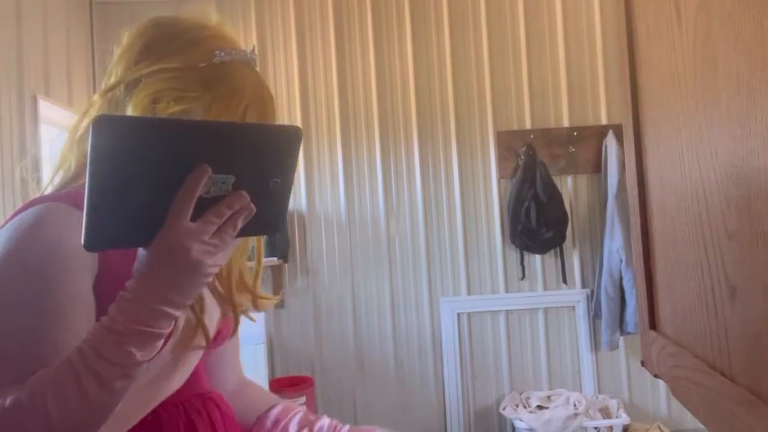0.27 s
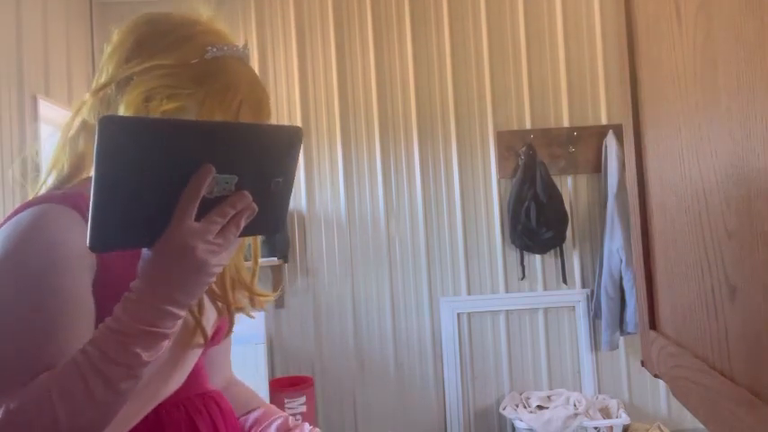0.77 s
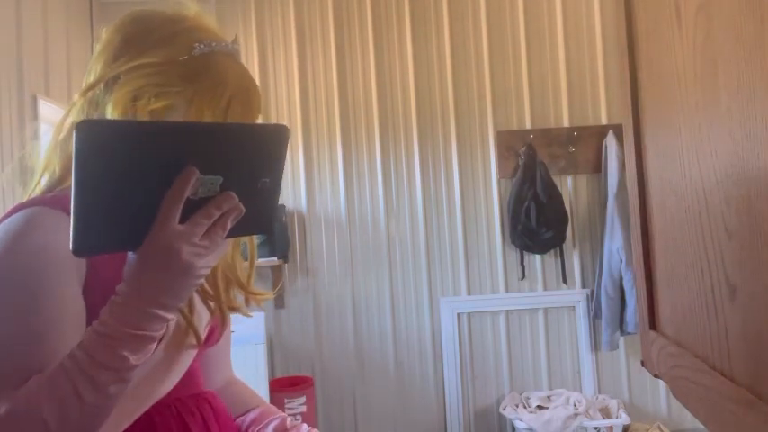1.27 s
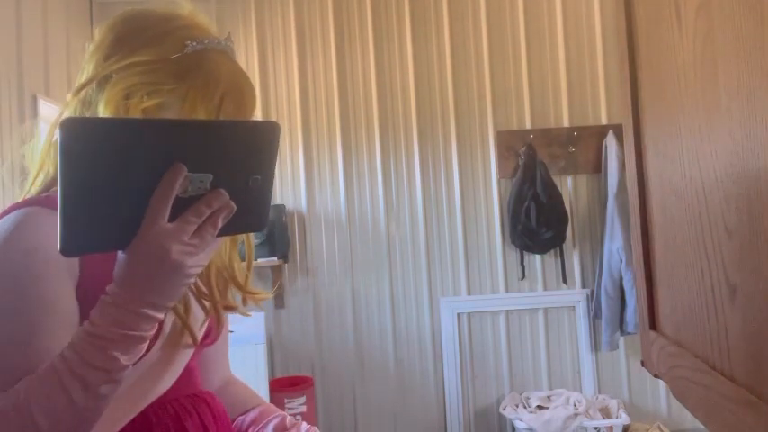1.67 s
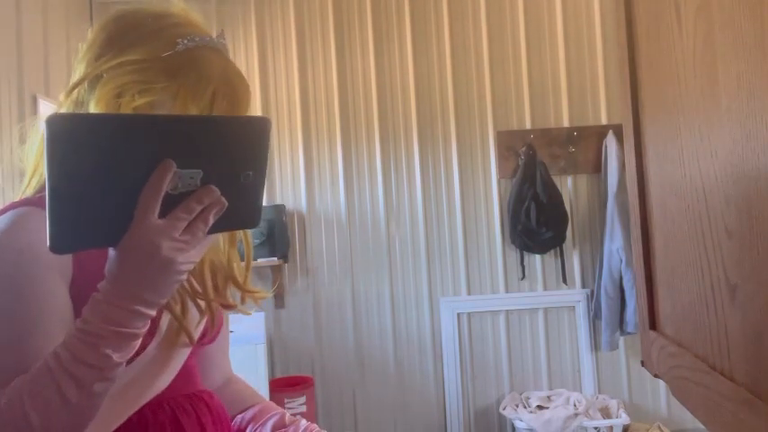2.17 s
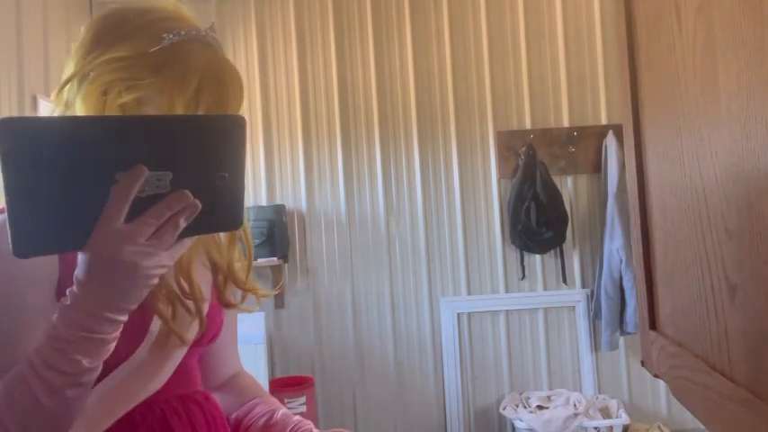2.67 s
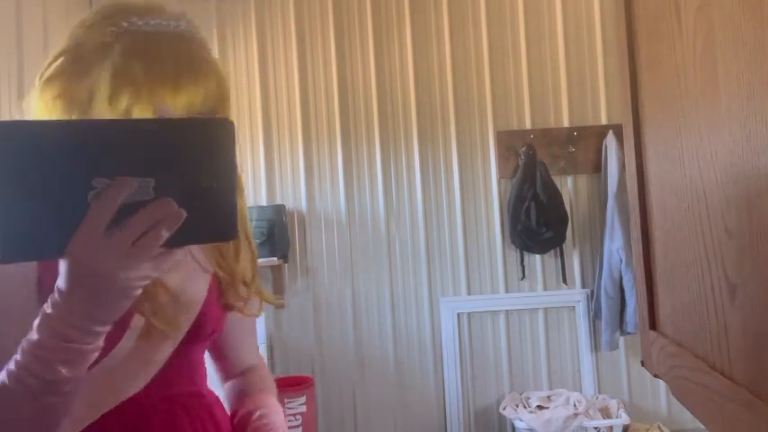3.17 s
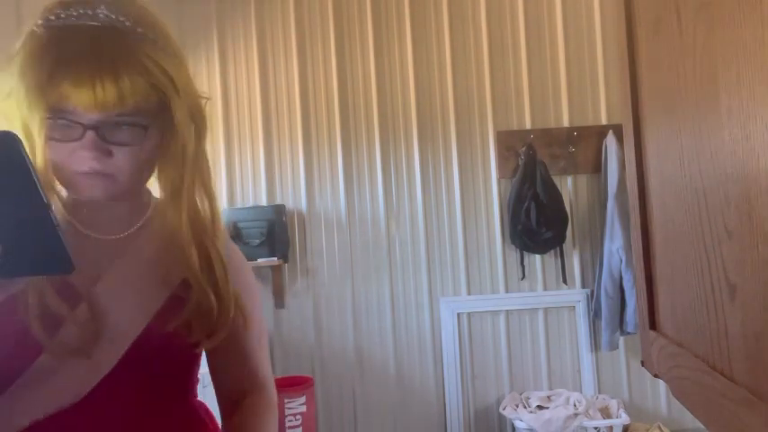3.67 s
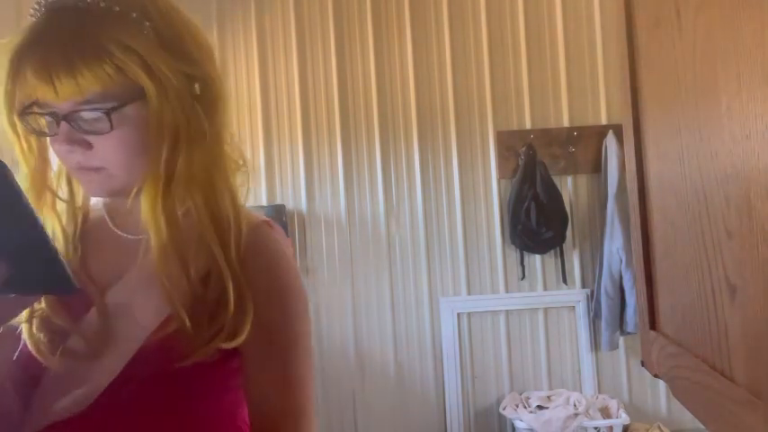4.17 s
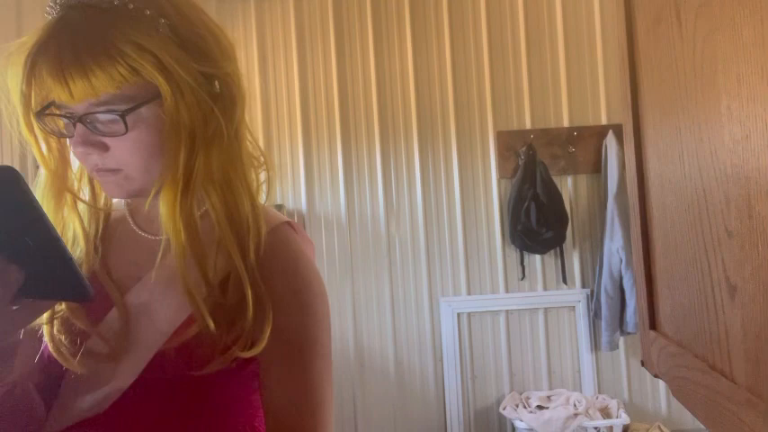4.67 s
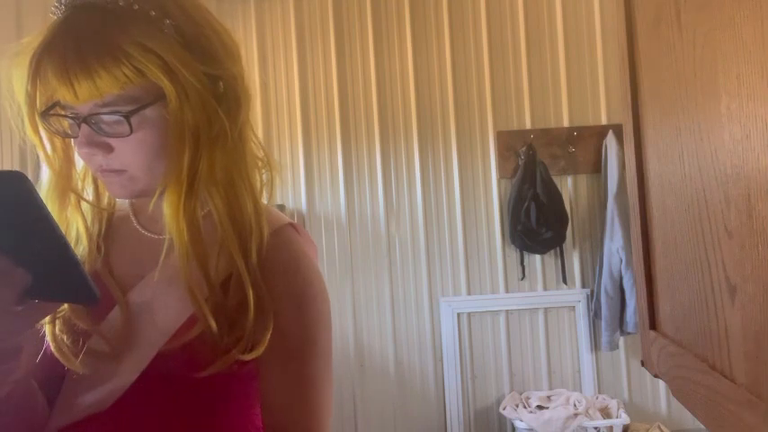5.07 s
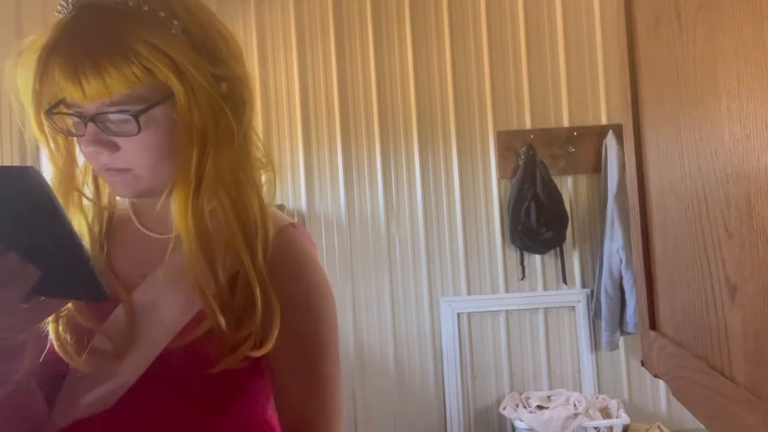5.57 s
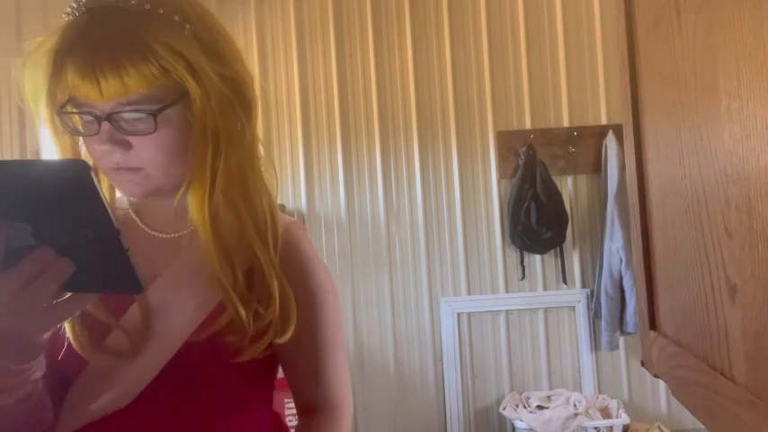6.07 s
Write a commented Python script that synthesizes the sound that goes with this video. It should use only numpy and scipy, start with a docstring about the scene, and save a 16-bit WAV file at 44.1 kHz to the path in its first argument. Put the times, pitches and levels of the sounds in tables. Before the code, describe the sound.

A small, bare, panelled room with short bright reflections and a quiet, steady low rumble with faint hiss. A light hollow ball strikes the hard floor at about 0.2 s with a clear click, a hollow ring near one kilohertz and a low knock, then again at 0.9 s, a little weaker. At 1.5 s its third landing comes with a rapid burst of loose, light clattering, over in about a tenth of a second plus its tail. Softer bounces follow at 1.85, 2.2 and 2.5 s. At 2.6 s a heavy thump, the loudest event, booms and rattles, the floor ringing low for half a second. From 2.9 s the bounces gradually quicken, becoming fainter, duller and more distant, dwindling into a soft patter. Cloth brushes lightly near the microphone from 2.9 to about 4 s, most noticeably near 3.5 s, and soft low bumps come around 4.9 to 5.2 s.

```python
"""A small, bare, panelled room: a light hollow ball bounces on its hard floor. Landings ring, click and knock.
On the third landing something loose clatters; a second later a heavy thump booms and rings the floor.
The bounces then quicken and soften, each flight a share of the last; cloth rustles and soft bumps join in.
Contacts are shaped noise that builds up and dies band by band; the thump adds decaying sine modes.
Under it all lies a quiet, steady low rumble with faint hiss."""
import sys
import numpy as np
from scipy import signal
from scipy.fft import rfft, irfft, next_fast_len
from scipy.io import wavfile

SR = 44100
rng = np.random.default_rng(int(sys.argv[2]) if len(sys.argv) > 2 else 0)


def generate_wav(signal):
    """Clip the signal to [-1, 1] and save it as 16-bit WAV at the path in sys.argv[1]."""
    frames = np.transpose(np.atleast_2d(signal))
    scaled = np.clip(frames, -1, 1) * 32767
    pcm = np.round(scaled).astype(np.int16)
    wavfile.write(sys.argv[1], SR, pcm)


N = 278182

# Separate landings of the ball. Each row: start in seconds, relative ring level in dB, relative click level in dB.
LANDINGS = [(0.237, -34.5, -45), (0.918, -37.5, -47.0), (1.518, -44, -42), (1.85, -44.0, -54.5),
            (2.201, -46.5, -56), (2.519, -45.5, -58)]
# Low resonances of the ball in the room. Each row: frequency in Hz, width in Hz, relative level in dB.
BALL_LOW_MODES = [(718.3, 29, -9), (900.6, 27, -4.5), (944.6, 16, -3), (1022.6, 23, 5.5)]
# High resonances of the ball in the room. Each row: frequency in Hz, width in Hz, relative level in dB.
BALL_HIGH_MODES = [(1128, 32, 0), (1167, 59, 1.5), (1257, 30, -6), (1435, 55, -13.5)]
# Floor resonances under a landing. Each row: frequency in Hz, width in Hz, relative level in dB.
FLOOR_KNOCK_MODES = [(109.9, 53, -9.5), (196.7, 21, 1.5), (267, 28, -1), (347, 47, -8.5), (667, 65, -20)]
# Spectrum of a hard shell contact. Each row: frequency in Hz, relative density in dB per Hz.
SHELL_SPECTRUM = [(100, -20), (550, -7), (900, -5.5), (1400, -2), (2500, -9), (4000, -15.5), (6500, -19),
                  (10000, -27.5), (15000, -28.5)]
# Knocks of the loose thing. Each row: start in seconds, level in dB.
CLATTER_KNOCKS = [(1.51, -45), (1.536, -31), (1.553, -32.5), (1.592, -33), (1.632, -36.5), (1.717, -52.5)]
# Spectrum of the loose thing. Each row: frequency in Hz, relative density in dB per Hz.
LOOSE_SPECTRUM = [(71, -47), (120, -25), (204, -11), (339, -10), (390, -8), (423, -10.5), (764, -11),
                  (1150, -0.5), (1790, -0.5), (3110, -5), (3440, -10), (7760, -24), (9710, -26.5),
                  (15500, -49.5)]
# Contacts of the heavy thump. Each row: start in seconds, boom level in dB, rattle level in dB.
THUMP_CONTACTS = [(2.605, -24, -39.5), (2.620, -32, -41), (2.645, -35.5, -41.5)]
# Floor modes under the heavy weight. Each row: frequency in Hz, relative level in dB, 60 dB decay in seconds.
FLOOR_WEIGHT_MODES = [(105.6, -6.5, 0.5), (124.9, -2, 0.4), (150, -2, 0.53), (165.3, -7.5, 0.54),
                      (208.3, -7.5, 0.62), (245.4, -18, 0.3), (249, -11, 0.75), (287, -13.5, 0.6),
                      (354, -28, 0.62), (384, -20, 0.27), (393, -14.5, 0.6), (528, -17.5, 0.64),
                      (742, -19, 0.61)]
# Spectrum of the thump's boom. Each row: frequency in Hz, relative density in dB per Hz.
BOOM_SPECTRUM = [(30, -50), (65, -10), (110, 3), (170, -5.5), (270, 4.5), (340, -14), (550, -11),
                 (800, -19.5), (1500, -65.5)]
# Spectrum of the thump's rattle. Each row: frequency in Hz, relative density in dB per Hz.
RATTLE_SPECTRUM = [(300, -6.5), (800, -1), (1500, -2), (3000, -6), (5000, -12.5), (8000, -19.5),
                   (11000, -31), (15000, -40.5)]
# Brushes of cloth. Each row: start in seconds, level in dB, rise in seconds, 60 dB decay in seconds.
CLOTH_BRUSHES = [(2.939, -64, 0.089, 0.18), (3.125, -61.5, 0.0058, 0.97), (3.20, -64.5, 0.032, 0.57),
                 (3.462, -56, 0.026, 0.42), (3.747, -68.5, 0.023, 1)]
# Spectrum of the cloth. Each row: frequency in Hz, relative density in dB per Hz.
CLOTH_SPECTRUM = [(600, 2), (2000, -0.5), (4000, -6), (7000, -10), (11000, -17), (15000, -28.5)]
# Soft low bumps. Each row: start in seconds, level in dB.
SOFT_BUMPS = [(4.886, -57.5), (4.971, -55.5), (5.125, -56), (5.236, -64.5)]
# Spectrum of a soft bump. Each row: frequency in Hz, relative density in dB per Hz.
BUMP_SPECTRUM = [(70, -23), (150, 3), (210, 17.5), (330, 6), (450, -0.5), (900, -48)]
# Spectrum of the quiet room. Each row: frequency in Hz, relative density in dB per Hz.
AIR_SPECTRUM = [(20, -0.5), (40, -2.5), (70, 1), (110, -1), (160, -10), (250, -13), (350, -21), (600, -26),
                (1200, -38), (2500, -45), (4700, -46), (7500, -51.5), (12000, -53), (15000, -62.5)]
# Room decay before each sound's own life factor. Each row: frequency in Hz, 60 dB decay in seconds.
ROOM_DECAY = [(60, 0.65), (200, 0.5), (500, 0.55), (1000, 0.55), (2000, 0.54), (4000, 0.55), (8000, 0.47),
              (14000, 0.29)]
# Stereo width. Each row: frequency in Hz, side minus mid in dB.
STEREO_WIDTH = [(60, -17.5), (110, -12.5), (200, -4), (290, -3.5), (400, 2.5), (640, 1.5), (1100, 1),
                (2400, 0.5), (4400, -1), (8000, 8), (12000, -14.5)]
# Stereo balance. Each row: frequency in Hz, left minus right in dB.
STEREO_LEAN = [(60, -6.5), (110, 1.5), (210, -9.5), (320, -4.5), (700, -1), (1300, -1), (15000, 0)]

BAND_LIMIT_HZ = 15500
AGE_S = np.arange(2 ** 15) / SR  # time since a contact
SETTLE_START_S, FIRST_FLIGHT_S = 2.8756, 0.31434
# Share of speed kept by a very gentle landing; drop in that share per second of flight.
REBOUND, REBOUND_LOSS_PER_S = 0.96229, 0.13777
# Relative levels at the first settling landing; how far each sinks as the speed falls to nothing.
SETTLE_RING_DB, RING_SINK_DB = -45.5, 19
SETTLE_CLICK_DB, CLICK_SINK_DB = -55.5, 27


def amp(db):
    """Decibels to gain."""
    return 10 ** (np.asarray(db) / 20)


def unit(x):
    """Scale to rms 1."""
    return x / np.sqrt(np.mean(x ** 2) + 1e-20)


def along(points, hz):
    """Read (Hz, value) points on a log frequency axis."""
    point_hz, value = np.transpose(points)
    return np.interp(np.log(hz + 1), np.log(point_hz + 1), value)


def lean_gain(hz):
    """Left and right gains, as rows: half the stereo lean each way."""
    return amp(along(STEREO_LEAN, hz) * np.array([[0.5], [-0.5]]))


def filtered(x, response):
    """Apply a gain curve in the frequency domain, zero-padded."""
    n = x.shape[-1]
    m = next_fast_len(n + 8192)
    spectrum = rfft(x, m) * response(np.fft.rfftfreq(m, 1 / SR))
    return irfft(spectrum, m)[..., :n]


def colour(points):
    """Gain curve of a (Hz, dB) spectrum."""
    return lambda hz: amp(along(points, hz))


def resonances(modes):
    """Gain curve of resonant peaks whose powers add."""
    def gain(hz):
        power = 0
        for mode_hz, width_hz, db in modes:
            power = power + amp(db) ** 2 / (1 + 2 * ((hz - mode_hz) / width_hz) ** 2) ** 2
        return np.sqrt(power)
    return gain


def diffuse(gain, n):
    """Coloured stereo noise of rms 1, arriving from all around: independent mid and side."""
    m = next_fast_len(n)
    hz = np.fft.rfftfreq(m, 1 / SR)
    mid, side = rng.standard_normal((2, len(hz), 2)) @ [1, 1j]
    width = colour(STEREO_WIDTH)(hz)
    share = lean_gain(hz) / np.sqrt(1 + width ** 2)
    left_right = np.array([mid + width * side, mid - width * side])
    return unit(irfft(gain(hz) * share * left_right, m)[:, :n])


def blow(gain, rise_s, hold_s, life=1):
    """One contact in the room: reflections build up, hold, then each band dies at its own speed."""
    hz, t_s, bands = signal.stft(diffuse(gain, len(AGE_S)), SR, nperseg=256)
    t60_s = life * along(ROOM_DECAY, hz)[:, None]
    fade = amp(-60 * np.maximum(t_s - hold_s, 0) / t60_s)
    tail = signal.istft(bands * fade, SR, nperseg=256)[1]
    tail = tail * (1 - np.exp(-AGE_S / rise_s))
    # energy of 0.1 s at rms 1
    return tail / np.sqrt(np.sum(tail ** 2) / (2 * SR / 10))


def throb(first_s, period_s, depth_db):
    """Gain that swells again and again as the sound swings between the walls."""
    return amp(depth_db * np.cos(2 * np.pi * (AGE_S - first_s) / period_s))


def add(track, start_s, sound):
    """Mix a sound into the track."""
    start = max(round(start_s * SR), 0)
    track[:, start:start + sound.shape[1]] += sound[:, :N - start]


def ball():
    """Each landing clicks the shell, rings the hollow ball and knocks the floor; soft ones last longer, duller."""
    out = np.zeros((2, N))
    for start_s, ring_db, click_db in LANDINGS + settling():
        softness_db = max(-37.5 - click_db, 0)  # below a hard landing
        # 0 to 1: the ball drifts away as it settles, more of it arrives by way of the walls
        far = min(softness_db / 25, 1)
        add(out, start_s, amp(click_db + 4) * shell_click(softness_db, far))
        add(out, start_s, amp(ring_db) * hollow_ring(far))
        add(out, start_s, amp(ring_db - 1.5 - 9.94 * far) * floor_knock())
    return out


def settling():
    """Each flight is a share of the one before; slower landings ring weaker and click weaker still."""
    landings, start_s, flight_s = [], SETTLE_START_S, FIRST_FLIGHT_S
    while start_s < N / SR:
        lost_speed = 1 - flight_s / FIRST_FLIGHT_S
        ring_db = SETTLE_RING_DB - RING_SINK_DB * lost_speed
        click_db = SETTLE_CLICK_DB - CLICK_SINK_DB * lost_speed
        landings.append((start_s, ring_db, click_db))
        start_s += flight_s
        flight_s *= REBOUND - REBOUND_LOSS_PER_S * flight_s
    return landings


def shell_click(softness_db, far):
    """Hard shell contact; a softer landing loses its treble."""
    edge_hz = 11500 * amp(-0.52 * softness_db)
    contact = lambda hz: colour(SHELL_SPECTRUM)(hz) / np.sqrt(1 + (hz / edge_hz) ** 4)
    click = blow(contact, rise_s=0.0037 + 0.016 * far, hold_s=0.022)
    return click * throb(first_s=0.01, period_s=0.016, depth_db=2 * far)


def hollow_ring(far):
    """Two groups of ball resonances; hard landings favour the lower."""
    hold_s = 0.011 + 0.074 * far
    low = blow(resonances(BALL_LOW_MODES), rise_s=0.011, hold_s=hold_s, life=0.82 + 0.078 * far)
    low = low * throb(first_s=0.017, period_s=0.047, depth_db=2.2 * far)
    high = blow(resonances(BALL_HIGH_MODES), rise_s=0.0046, hold_s=hold_s, life=0.83 + 0.15 * far)
    high = high * throb(first_s=0.015, period_s=0.041, depth_db=3 * far)
    return amp(-1.5 - 2 * far) * low + amp(-8.5 + 5.5 * far) * high


def floor_knock():
    """The floor's resonances answer a landing."""
    return blow(resonances(FLOOR_KNOCK_MODES), rise_s=0.0045, hold_s=0.029, life=0.66)


def clatter():
    """A light loose thing is knocked in a quick burst; each knock's level wavers at random as it rocks."""
    out = np.zeros((2, N))
    for start_s, db in CLATTER_KNOCKS:
        chatter = np.interp(AGE_S, np.linspace(0, 1, 160), rng.standard_normal(160))
        knock = blow(colour(LOOSE_SPECTRUM), rise_s=0.0064, hold_s=0.011, life=1.074)
        add(out, start_s, amp(db + 0.75 * chatter) * knock)
    return out


def thump():
    """Heavy contacts boom through the floor and rattle things on it; from the second the floor modes ring."""
    out = np.zeros((2, N))
    for start_s, boom_db, rattle_db in THUMP_CONTACTS:
        boom = blow(colour(BOOM_SPECTRUM), rise_s=0.0055, hold_s=0.005, life=0.96)
        rattle = blow(colour(RATTLE_SPECTRUM), rise_s=0.0065, hold_s=0.037, life=1.08)
        add(out, start_s, amp(boom_db) * boom + amp(rattle_db) * rattle)
    add(out, THUMP_CONTACTS[1][0], amp(-23.5) * floor_ring())
    return out


def floor_ring():
    """Floor modes as decaying sines with a very fast onset."""
    ring = np.zeros((2, len(AGE_S)))
    for hz, db, t60_s in FLOOR_WEIGHT_MODES:
        decay = amp(db - 60 * AGE_S / t60_s)
        ring += lean_gain(hz) * decay * np.sin(2 * np.pi * hz * AGE_S)
    return ring * (1 - np.exp(-AGE_S / 0.00047))


def handling():
    """Someone shifts near the microphone: cloth strokes of swelling, fading noise, and soft low bumps."""
    out = np.zeros((2, N))
    for start_s, db, rise_s, t60_s in CLOTH_BRUSHES:
        swell = np.minimum(AGE_S / rise_s, 1)
        fade = amp(-60 * np.maximum(AGE_S - rise_s, 0) / t60_s)
        add(out, start_s, amp(db) * swell * fade * diffuse(colour(CLOTH_SPECTRUM), len(AGE_S)))
    for start_s, db in SOFT_BUMPS:
        bump = blow(colour(BUMP_SPECTRUM), rise_s=0.005, hold_s=0.005, life=0.71)
        add(out, start_s, amp(db) * bump)
    return out


def room_tone():
    """Steady diffuse noise: low rumble, faint hiss."""
    return amp(-57.5) * diffuse(colour(AIR_SPECTRUM), N)


def scene():
    """All sources together."""
    return ball() + clatter() + thump() + handling() + room_tone()


def record(dry):
    """The recorder drops the deepest bass and keeps nothing above its band limit."""
    highpass = signal.butter(4, 45, "highpass", fs=SR, output="sos")
    without_deep_bass = signal.sosfilt(highpass, dry)
    return filtered(without_deep_bass, lambda hz: hz < BAND_LIMIT_HZ)


dry = scene()
out = record(dry)
generate_wav(out)
```